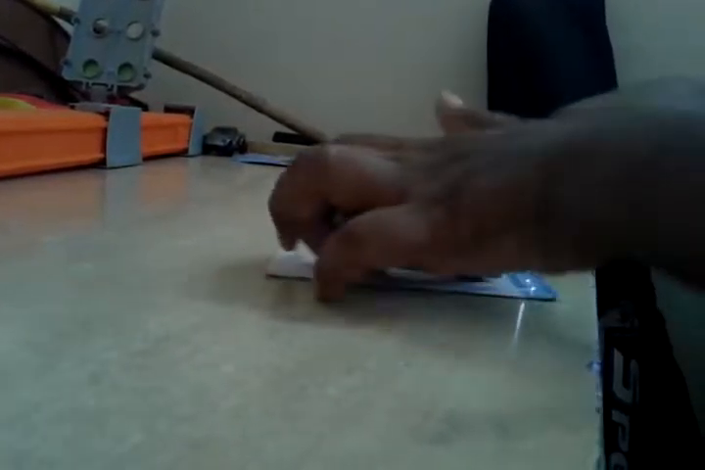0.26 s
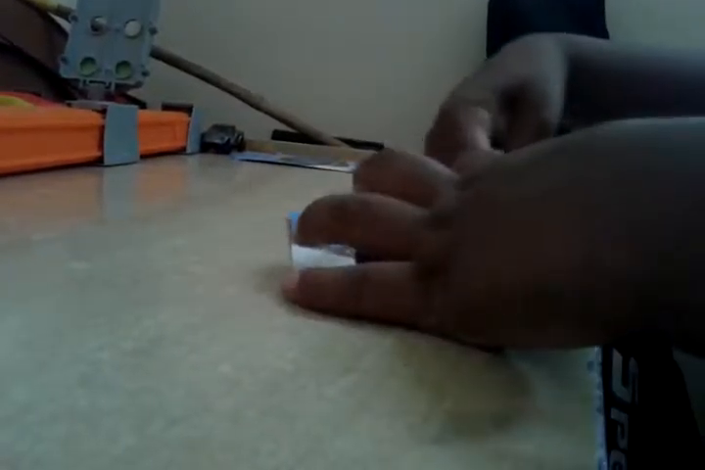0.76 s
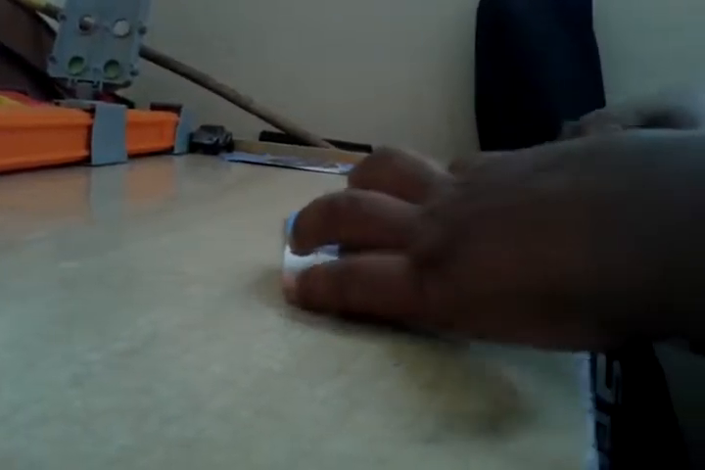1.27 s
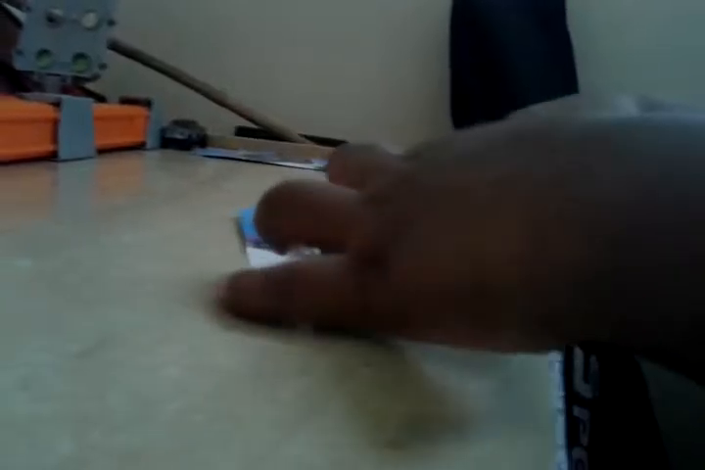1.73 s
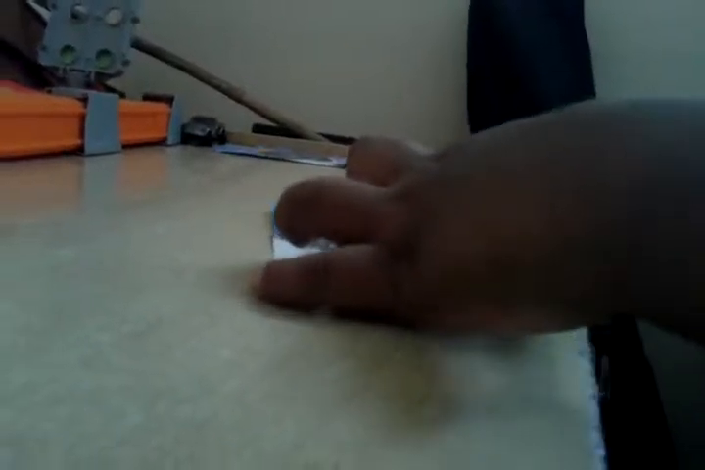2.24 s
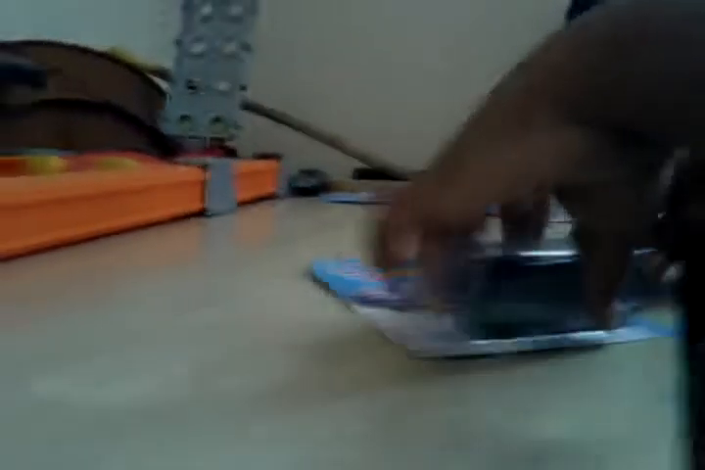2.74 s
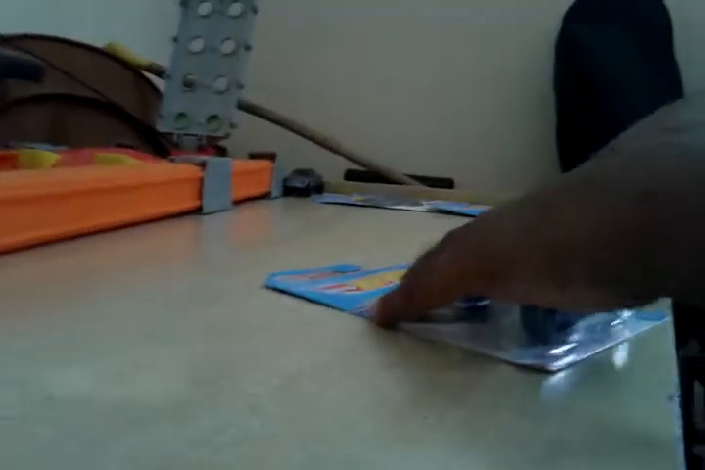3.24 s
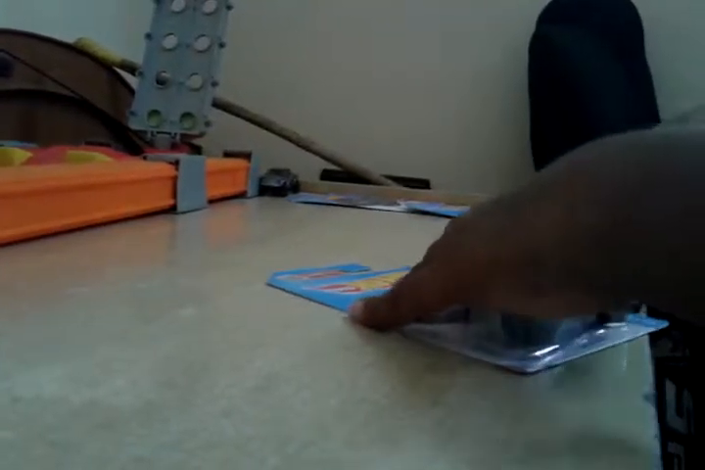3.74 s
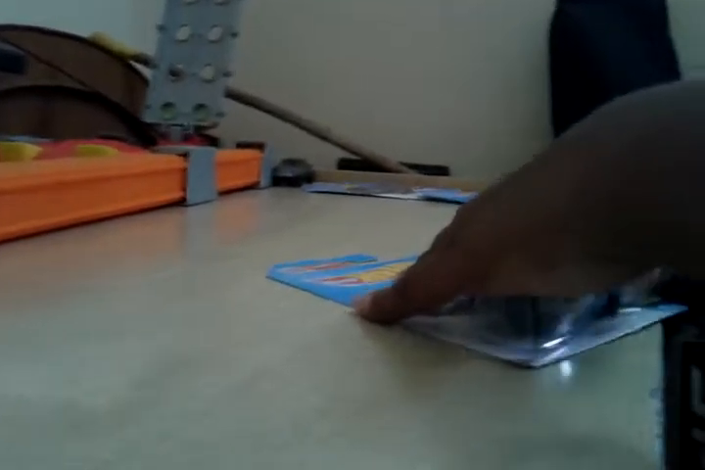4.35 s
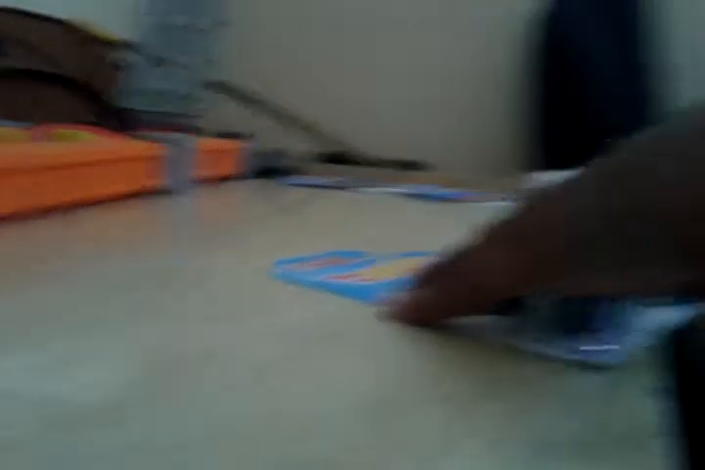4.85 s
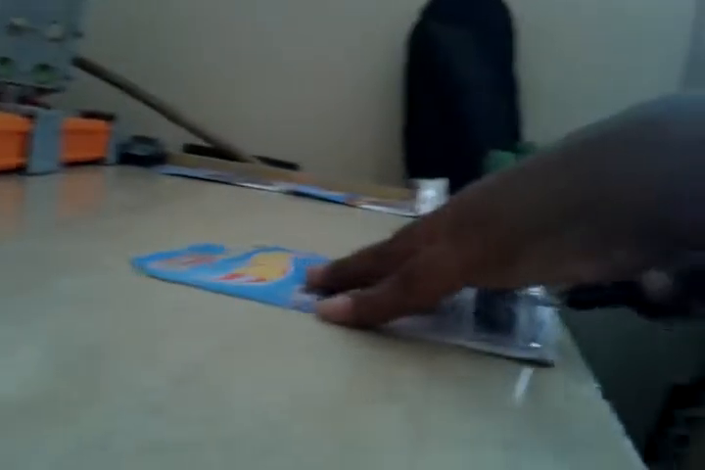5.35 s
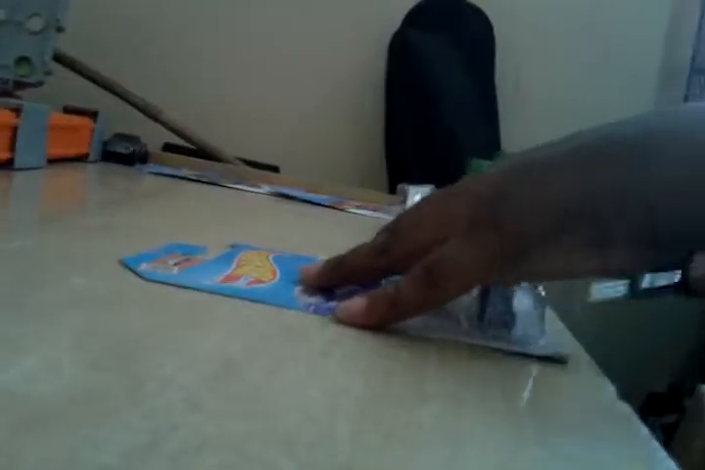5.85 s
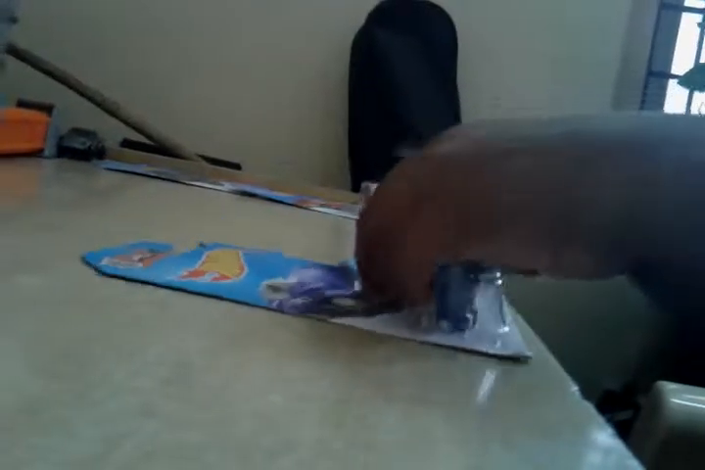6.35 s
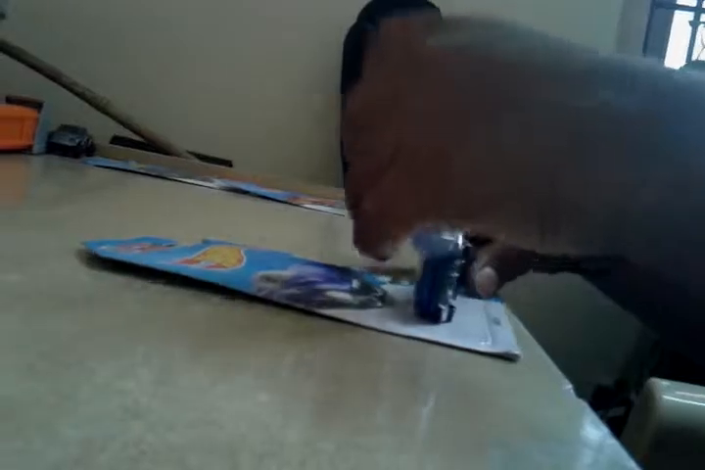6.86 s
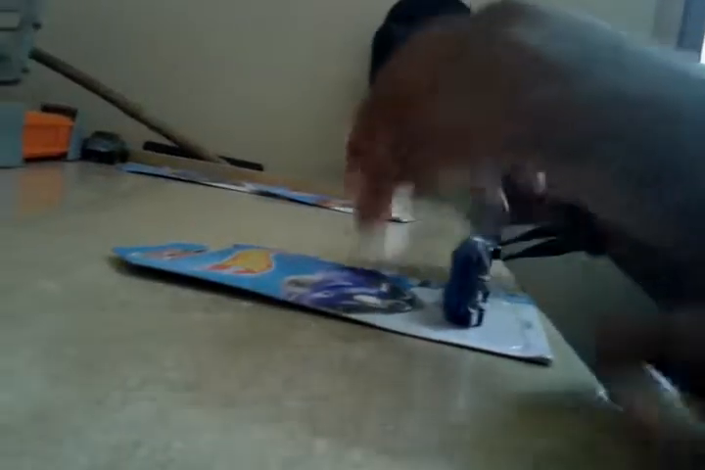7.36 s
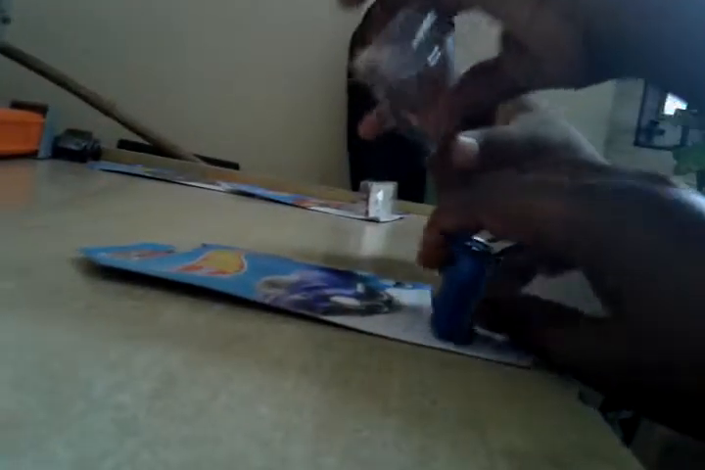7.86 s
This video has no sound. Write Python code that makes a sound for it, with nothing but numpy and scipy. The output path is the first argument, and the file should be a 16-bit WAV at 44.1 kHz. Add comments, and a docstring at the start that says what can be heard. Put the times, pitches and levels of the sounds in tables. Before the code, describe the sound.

In a small room with a steady low rumble and faint electrical hum, a plastic toy package is worked open close by. It starts with a couple of bright cracks, followed by scattered clicks, finger friction and a knock on the table. The crackling grows denser as the glued rim peels, eases briefly, then gives a strong burst of snaps and some final rustling. Each snap has a brief room echo.

```python
"""Sharp plastic snaps and crackling rubs sound over the low rumble and faint mains hum of a small room.
A toy car's blister is being pressed and peeled off its cardboard backing on a table. The thin dome
buckles, and each snap rings briefly in the plastic's modes and excites the room's reverberation.
Between the snaps fingers rub by stick-slip friction, the glued rim crackles and the card bumps the table."""
import sys
import numpy as np
from scipy import signal
from scipy.fft import rfft, irfft, next_fast_len
from scipy.io import wavfile

SR = 44100
rng = np.random.default_rng(int(sys.argv[2]) if len(sys.argv) > 2 else 0)


def waveform_to_disk(signal):
    """Save audio, clipped to [-1, 1], as 16-bit WAV at the path in sys.argv[1]."""
    frames = np.transpose(np.atleast_2d(signal))
    scaled = np.clip(frames, -1, 1) * 32767
    samples = np.round(scaled).astype(np.int16)
    wavfile.write(sys.argv[1], SR, samples)


N = 357341

# frequency bands of a snap, in the order card, dome, crack, fizz: low_hz, high_hz
SNAP_BANDS = [(780, 1650), (1600, 2950), (4100, 8700), (8700, 18000)]
# strokes of fingers and peeling rim over the plastic: middle_s, half_length_s, level_db
FRICTION_STROKES = [(0.221,0.23,-44), (0.247,0.013,-35), (0.545,0.066,-53), (0.896,0.046,-35.5),
                    (1.398,0.095,-40), (1.978,0.095,-41.5), (2.277,0.017,-37), (2.313,.06,-36.5),
                    (2.613,0.062,-41), (2.773,0.0075,-36), (2.838,0.094,-43), (3.135,0.014,-43.5),
                    (3.179,0.016,-37.5), (3.202,0.037,-47), (3.26,.006,-31), (3.39,0.0061,-29),
                    (3.903,0.094,-46.5), (4.243,0.0089,-45), (4.386,0.1,-39.5), (4.455,.01,-30.5),
                    (4.498,0.013,-33.5), (4.679,0.14,-45), (4.799,0.027,-34.5), (5.204,0.35,-46),
                    (5.662,.09,-44.5), (5.934,0.037,-49), (6.58,.05,-54.5), (6.796,0.055,-59),
                    (7.716,0.032,-47), (7.851,0.012,-40), (7.993,0.19,-43)]
SMALL_CREASE_HZ = 7550   # ring of a small, high-pitched crease


def from_db(db):
    """Amplitude ratio of a level in decibels."""
    return 10 ** (np.asarray(db) / 20)


def rms_one(x):
    """Normalise power: rms 1."""
    return x / np.sqrt(np.mean(x ** 2) + 1e-20)


def energy_one(x):
    """Normalise energy: a sum of squares of 1."""
    return x / np.sqrt(np.sum(x ** 2) + 1e-20)


def decay(t, t60):
    """Exponential damping: 60 dB lost in t60 seconds."""
    return from_db(-60 * t / t60)


def in_time(rows):
    """Linear interpolation of (time_s, value) rows at every sample."""
    return np.interp(np.arange(N) / SR, *np.transpose(rows))


def at_hz(points, hz):
    """Interpolation of (frequency_hz, value) points on a logarithmic frequency axis."""
    f, value = np.transpose(points)
    return np.interp(np.log(np.maximum(hz, 1)), np.log(f), value)


def drift(per_s):
    """Slow random modulation with a spread of about 1."""
    knots = rng.standard_normal(4000)
    return np.interp(np.arange(N) / SR * per_s, np.arange(len(knots)), knots)


def add(out, start_s, sound):
    """Superposition: a sound joins the mix at start_s."""
    i = max(0, round(start_s * SR))
    out[i:i + len(sound)] += sound[:max(0, N - i)]


def band_filter(low_hz, high_hz, order=3):
    """Second-order sections of a causal band-pass."""
    return signal.butter(order, [low_hz, min(high_hz, .47 * SR)], "band", fs=SR, output="sos")


def resonance(x, hz, width_hz):
    """Two-pole resonator with unit gain at its peak."""
    r = np.exp(-np.pi * width_hz / SR)
    feedback = [1, -2 * r * np.cos(2 * np.pi * hz / SR), r * r]
    return signal.lfilter(np.array([1, 0, -1]) * (1 - r * r) / 2, feedback, x)


def with_peaks(x, peaks):
    """Forced response: a sound plus the resonances that it drives."""
    return x + sum(from_db(db) * resonance(x, hz, width) for hz, width, db in peaks)


def coloured(x, spectrum):
    """Spectral shaping of a steady sound, returned at rms 1."""
    size = next_fast_len(N)
    gain = from_db(at_hz(spectrum, np.arange(size // 2 + 1) * SR / size))
    return rms_one(irfft(rfft(x, size) * gain, size)[:N])


def room_tone(rumble_db=-47.5, flutter_db=2.02, mains_hz=60, hum_db=-3):
    """Ambient noise: broadband rumble and hiss plus two mains harmonics, all amplitude-modulated."""
    # spectral density of rumble and hiss: frequency_hz, density_db
    spectrum = [(25, -24), (60, -19.5), (150, -15.5), (200, -7.5), (300, -1), (375, -9.5), (500, -5),
                (1050, -11.5), (2390, -20), (4060, -30.5), (6000, -27), (7300, -28), (9500, -37),
                (17000, -38.5)]
    # resonance in the rumble: pitch_hz, width_hz, gain_db
    peaks = [(327, 59, -6.5)]
    # slow swell of the rumble: time_s, gain_db
    swell = [(0,-2), (.25,2), (.7,-3), (1.33,1), (1.76,0), (2.05,0), (2.48,2), (2.9,-0.5), (3.55,-1.5),
             (4.1,-2), (4.5,0.5), (4.75,0), (5.64,1), (6.14,-0.5), (6.5,1.5), (6.8,-.5), (8.1,1)]
    # strength of the hum's harmonics: time_s, fundamental_db, octave_db
    hum_levels = [(.1,-59,-73), (.3,-68,-71), (.8,-74,-71), (1.15,-72,-69), (1.4,-60.5,-70), (2.05,-66,-75),
                  (2.45,-57.5,-66), (2.85,-68,-71), (3.3,-58,-61), (3.95,-82,-74), (4.55,-70,-64),
                  (4.95,-71,-77), (5.25,-61,-70), (5.6,-71,-72), (6.45,-69,-68), (7.3,-66,-80),
                  (8.1,-68,-65)]
    noise = rms_one(with_peaks(coloured(rng.standard_normal(N), spectrum), peaks))
    noise_db = rumble_db + in_time(swell) + flutter_db * drift(18)
    phase = 2 * np.pi * mains_hz * np.arange(N) / SR + .5 * drift(4.2)
    fundamental = from_db(in_time([(s, db) for s, db, _ in hum_levels]) + hum_db) * np.sin(phase)
    octave = from_db(in_time([(s, db) for s, _, db in hum_levels]) + hum_db) * np.sin(2 * phase)
    return from_db(noise_db) * noise + np.sqrt(2) * (fundamental + octave)


def room(x, level_db=-1, build_s=0.0002, treble_db=-2):
    """Reverberation: dense reflections off table and near walls build at once and decay band by band."""
    # reverberation time of the room: frequency_hz, t60_s
    decay_times = [(300, 0.19), (800, 0.22), (2100, 0.33), (6000, 0.22), (14000, 0.27)]
    t = np.arange(SR // 2) / SR
    edges_hz = np.geomspace(100, 18000, 11)
    response = 0
    for low, high in zip(edges_hz, edges_hz[1:]):
        hz = np.sqrt(low * high)
        gain = from_db(treble_db * np.clip(np.log2(hz / 6000), 0, 1))
        reflections = signal.sosfilt(band_filter(low, high, order=2), rng.standard_normal(len(t)))
        response = response + gain * reflections * decay(t, at_hz(decay_times, hz))
    build_up = (1 - np.exp(-t / build_s)) ** 2
    return from_db(level_db) * signal.fftconvolve(x, energy_one(response * build_up))[:N]


def bumps(contact_s=0.0002, lowest_hz=170):
    """Impact: soft contacts ring damped modes of card and table; the deep bass is rolled off."""
    # one damped mode of a bump per row (the loud knock rings three): start_s, level_db, pitch_hz, t60_s
    bump_modes = [(.186, -35.5, 270, 0.078), (.547, -42, 480, 0.05), (1.379, -27.5, 573, 0.029),
                  (1.92, -38, 427, 0.044), (2.058, -35.5, 330, 0.078), (2.154, -36, 322, 0.047),
                  (2.2875, -28, 300, 0.02), (2.288, -12, 757, 0.023), (2.289, -29, 1253, 0.16),
                  (2.459, -32.5, 395, 0.075), (3.035, -35, 298, 0.037), (3.596, -38, 497, .05),
                  (3.71, -42, 330, .05), (4.66, -42, 313, 0.053), (4.339, -37, 297, 0.074),
                  (5.774, -35, 134, 0.057), (5.773, -25, 340, 0.039)]
    out, t = np.zeros(N), np.arange(SR // 4) / SR
    attack = 1 - np.exp(-t / contact_s)
    for start_s, db, hz, t60 in bump_modes:
        add(out, start_s, from_db(db) * np.sin(2 * np.pi * hz * t) * decay(t, t60) * attack)
    return signal.sosfilt(band_filter(lowest_hz, 4000, order=2), out + 1e-18)


def rubbing(level_db=-4, slips_per_s=350, spread_db=-0.5, clump_db=5, hiss_db=-3,
            grip_db=-56, grip_waver_db=2):
    """Stick-slip friction: clumps of tiny slips over the hiss of skin on plastic swell with each stroke."""
    # spectral density of the friction noise: frequency_hz, density_db
    spectrum = [(100, -18), (300, 7.5), (700, 1.5), (1400, 7), (2400, -5), (3700, 1.5), (5500, -1.5),
                (7200, 7), (9500, -9.5), (15000, -15.5)]
    slipping = rng.random(N) < slips_per_s * from_db(clump_db * drift(45)) / SR
    slips = slipping * from_db(spread_db * np.minimum(rng.exponential(1, N), 3.5))
    # every slip shakes the sheet for about a millisecond
    shaking = signal.lfilter([1], [1, -np.exp(-1 / (0.001 * SR))], slips + 1e-18)
    friction = rms_one(shaking * rng.standard_normal(N)) + from_db(hiss_db) * rng.standard_normal(N)
    force = from_db(grip_db + grip_waver_db * drift(8))   # resting fingers never keep quite still
    for middle_s, half_s, db in FRICTION_STROKES:
        add(force, middle_s - half_s, from_db(db) * np.hanning(round(2 * half_s * SR)))
    return from_db(level_db) * force * coloured(friction, spectrum)


def crinkles(per_s=20, level_db=-4.5, spread_db=5, body_db=-6, fizz_db=-15, t60_s=.022,
             room_db=-5, low_hz=1300, high_hz=2600):
    """Small-scale buckling: rows of tiny snaps crowd the middle of each longer stroke and scale with it."""
    rows = []
    for middle_s, half_s, stroke_db in FRICTION_STROKES:
        draws = rng.random((20, 5))[:int(per_s * 2 * half_s)]
        for early, late, size, panel, crease in draws:
            start_s = middle_s + half_s * (late - early)
            db = stroke_db + level_db + spread_db * (2 * size - 1)
            panel_hz = low_hz * (high_hz / low_hz) ** panel
            crease_hz = SMALL_CREASE_HZ * 2 ** (-crease / 2)
            rows.append((start_s, db, db + body_db, db + fizz_db, panel_hz, crease_hz, t60_s, room_db))
    return rows


def body_levels(body_db, panel_hz, even_share_hz=1654, steepness=6.5):
    """Energy partition between card and dome: a low panel mode drives the card, a high one the dome."""
    dome_share = 1 / (1 + (even_share_hz / panel_hz) ** steepness)
    return body_db + 10 * np.log10(1 - dome_share), body_db + 10 * np.log10(dome_share)


def snap(levels_db, rings, t60, filters, treble_damping=0.16, break_db=-1, break_s=0.00035):
    """Snap-through buckling: a hard first break, then dense modes, the high ones damped fastest."""
    # resonances common to all snaps, among them a broad lift near 7 kHz: pitch_hz, width_hz, gain_db
    common_peaks = [(1340, 79, -5), (2280, 900, -1.5), (6180, 340, -6), (6980, 1000, 5.5), (7660, 160, -4),
                    (10000, 1050, -9)]
    t = np.arange(3000) / SR
    out = np.zeros(len(t))
    for (low_hz, _), sos, db in zip(SNAP_BANDS, filters, levels_db):
        band_t60 = max(t60, .003) * (4000 / low_hz) ** treble_damping
        envelope = decay(t, band_t60) + from_db(break_db) * np.exp(-t / break_s)
        modes = with_peaks(rng.standard_normal(len(t)) * envelope, common_peaks + rings)
        out += from_db(db) * energy_one(signal.sosfilt(sos, modes))
    return out * np.sqrt(SR / 100)   # band levels are rms over a hundredth of a second


def blister(level_db=-3.0, panel_db=11, panel_width_hz=200, crease_db=1, crease_width_hz=400,
            crease_db_per_octave=13, all_round_db=-8, path_sets=4):
    """Directivity: each buckling fold faces its own way and sends its own share into the room."""
    # buckling folds: start_s, crack_db, body_db, fizz_db, panel_hz, crease_hz, t60_s, room_share_db
    folds = [(.0638,-47,-36,-57,1274,5260,0.021,-1), (.0764,-31.5,-41,-58,1900,6800,0.013,-9),
             (.1013,-34.5,-36,-51,2010,6060,0.015,-3), (.1683,-15.5,-21,-19,1330,7700,0.012,-10),
             (.1852,-15.5,-17.5,-35,1860,7050,.015,-5), (.1913,-34,-32,-46,2250,7240,0.0096,4),
             (.3234,-27,-33,-35,1250,7840,.0075,-9.5), (.4642,-39,-34,-53,1500,6070,0.054,-11),
             (.8292,-35,-40.5,-57,2030,7000,0.016,1), (.8744,-22.5,-32.5,-50,1750,6910,0.021,-8.5),
             (1.2134,-44,-43.5,-52,1750,6580,.022,-5), (1.3184,-30.5,-24.5,-40,2020,6140,0.028,-11),
             (1.3523,-36,-48,-46,1900,4200,0.059,-5), (1.378,-26.5,-23.5,-49,1390,7570,0.0078,-7.5),
             (1.394,-34,-25.5,-45,1390,4000,0.039,-12), (1.6881,-39.5,-42,-51,1510,7840,0.051,-6),
             (1.9178,-44,-35.5,-65,1220,6380,0.024,-5), (1.9437,-41,-40,-65,1070,4700,.047,-18),
             (2.0138,-34,-38,-42,1440,7630,0.051,-9), (2.1272,-46,-50,-57,1500,6700,.025,-1),
             (2.277,-30,-26.5,-38,1340,5950,0.047,-4), (2.288,-19.5,-18,-41,1260,3430,0.017,-10.5),
             (2.4761,-42,-42,-53,1416,8000,.08,-16), (2.5542,-40,-43,-47,1440,6140,0.034,-9),
             (2.5935,-18.5,-26,-43,2200,5840,0.007,-7.5), (2.6854,-36,-37,-48,1600,6340,0.029,-4),
             (2.7852,-25,-47,-55,2160,6900,0.01,-9), (2.836,-36.5,-38.5,-62,2000,5300,0.037,-6.5),
             (3.1813,-36.5,-34.5,-62,1550,7420,0.05,-6), (3.2615,-29,-40,-36,2630,6200,0.016,-4),
             (3.325,-29,-40,-42,2610,6970,0.013,-15), (3.3309,-23,-28.5,-42,2550,6940,0.005,-8),
             (3.375,-27,-32.5,-44,1620,5210,.049,-9), (3.4287,-35.5,-60,-48,1810,6700,.013,-8),
             (3.442,-40,-44,-56,2180,5700,.014,-17), (3.8057,-32,-40.5,-60,2260,5330,0.021,-4),
             (3.8517,-28.5,-41,-38,2000,7170,0.018,-9), (3.8969,-42.5,-47,-62,2100,3820,0.023,-5),
             (3.9344,-37.5,-43.5,-61,2110,5830,0.005,-1.5), (4.3332,-37,-39.5,-57,2070,5990,.008,-14),
             (4.3366,-19.5,-18.5,-44,2040,5900,0.013,-11), (4.3825,-26.5,-37,-51,1885,6550,.0078,-10),
             (4.3901,-24,-31,-32,1480,7960,0.011,-17), (4.4559,-35,-31.5,-60,1590,6300,0.024,-1.5),
             (4.54,-34.5,-41.5,-50,1690,6160,0.0087,-8), (4.6118,-32,-36,-45,2370,6930,0.014,-10),
             (4.6417,-26.5,-40,-39,2620,7150,0.0026,-11), (4.6493,-31,-45,-45,2610,7800,0.011,-18),
             (4.715,-48,-33,-48,1040,8240,0.012,-12), (4.8008,-23,-35.5,-30,2100,7900,0.019,-4),
             (4.853,-34.5,-41.5,-59,2570,6070,0.01,-5), (4.9232,-40,-42,-52,1490,5610,.023,-3),
             (4.9922,-39.5,-48,-60,1230,5750,0.027,-18), (5.0502,-34.5,-38,-53,2720,5320,0.024,-24),
             (5.1269,-23.5,-42,-40,2400,6700,0.014,-8), (5.163,-43,-44,-56,2440,5770,.05,-7),
             (5.183,-36,-34,-61,2540,5220,.02,-15), (5.2211,-24.5,-30.5,-38,1473,6900,.012,-12),
             (5.2578,-34,-38.5,-59,2550,6280,0.03,-8), (5.2769,-30,-39.5,-58,2420,5670,.023,-13),
             (5.3236,-37,-45,-58,1290,7020,.012,-1), (5.3635,-27.5,-32.5,-48,1400,7300,0.012,-7.5),
             (5.443,-34.5,-37,-52,2340,7600,0.027,-6), (5.6214,-20,-19,-35,1514,7750,0.031,-8),
             (5.773,-46,-38.5,-54,1040,5740,0.018,-4), (5.9353,-46,-44.5,-57,2000,8000,0.053,-5),
             (6.0378,-43.5,-40.5,-59,1424,5840,0.038,-3), (6.4078,-20,-31,-36,2570,5840,0.02,-15.5),
             (6.43,-14.5,-27.5,-37,2210,5500,.01,-5.5), (6.4322,-18.5,-19,-28,2500,5960,0.035,-6.5),
             (6.4602,-23.5,-39,-36,1960,5620,0.037,0), (6.767,-34.5,-42,-52,1510,4960,0.016,-16),
             (6.913,-38.5,-42,-59,2440,5250,.058,-8), (7.498,-48,-54,-61,2000,3760,.03,-8),
             (7.5739,-36.5,-48,-44.5,1530,8000,0.067,-22), (7.8091,-42.5,-45.5,-50,2300,4950,0.033,-1),
             (7.9291,-28.5,-27,-40,1820,5660,0.038,-11), (8.0313,-31.5,-55,-48,2400,7290,.005,-2),
             (8.0445,-31,-42,-40,2680,5580,0.054,-5)]
    direct, into_room = np.zeros(N), np.zeros((path_sets, N))
    card, dome, crack, fizz = [band_filter(low, high) for low, high in SNAP_BANDS]
    crack_low_hz, crack_high_hz = SNAP_BANDS[2]
    for k, fold in enumerate(folds + crinkles()):
        start_s, crack_db, body_db, fizz_db, panel_hz, crease_hz, t60, room_db = fold
        levels_db = *body_levels(body_db, panel_hz), crack_db, fizz_db
        # a bigger crease rings lower and stronger, and the crack reaches down to its ring
        ring_db = crease_db + crease_db_per_octave * np.log2(SMALL_CREASE_HZ / crease_hz)
        rings = [(panel_hz, panel_width_hz, panel_db), (crease_hz, crease_width_hz, ring_db)]
        reach_hz = crease_hz - crease_width_hz
        fold_crack = band_filter(reach_hz, crack_high_hz) if reach_hz < crack_low_hz else crack
        filters = card, dome, fold_crack, fizz
        add(direct, start_s, from_db(level_db) * snap(levels_db, rings, t60, filters))
        # the room receives all sides of the dome, so single rings stand out less in it
        blurred = [(hz, width, db + all_round_db) for hz, width, db in rings]
        radiated = from_db(level_db + room_db) * snap(levels_db, blurred, t60, filters)
        add(into_room[k % path_sets], start_s, radiated)
    return direct + sum(room(x) for x in into_room)   # each set of paths has its own reflections


def scene(rub_room_db=-5, bump_room_db=-16):
    """Direct and reverberant fields add; bumps travel mostly through the table and arrive nearly dry."""
    rubbed, bumped = rubbing(), bumps()
    reflected = room(from_db(rub_room_db) * rubbed + from_db(bump_room_db) * bumped)
    return (blister() + rubbed + bumped + reflected + room_tone())[None]


def record(dry, droop_hz=15500, cutoff_hz=19000):
    """Clipping and band limiting: peaks stop at full scale, and the top treble droops and is cut."""
    clipped = np.clip(dry, -1, 1)
    softened = signal.sosfilt(signal.butter(4, droop_hz, fs=SR, output="sos"), clipped)
    return signal.sosfilt(signal.ellip(8, .2, 70, cutoff_hz, fs=SR, output="sos"), softened)


dry = scene()
out = record(dry)
waveform_to_disk(out)
```